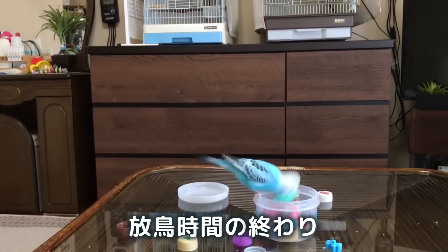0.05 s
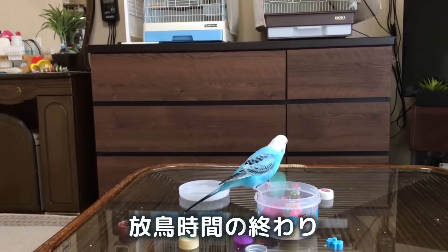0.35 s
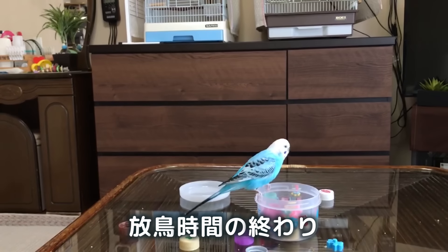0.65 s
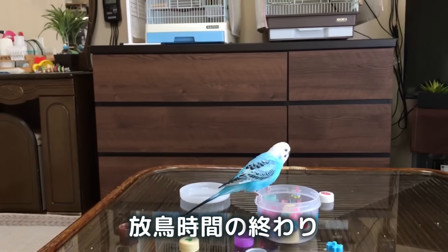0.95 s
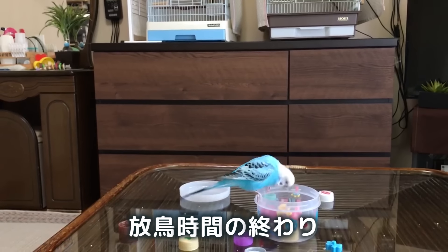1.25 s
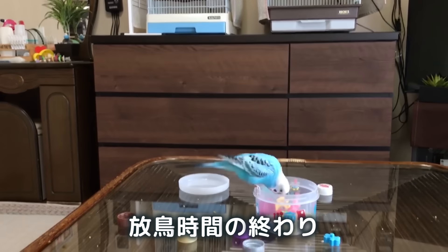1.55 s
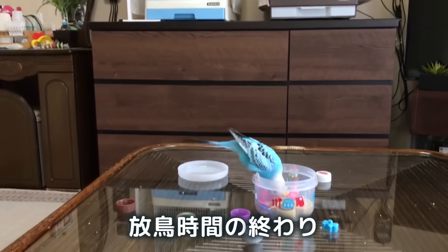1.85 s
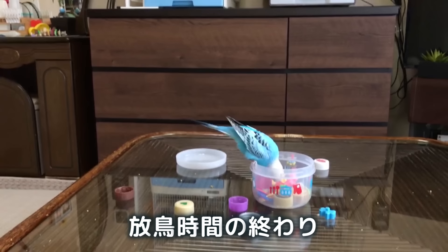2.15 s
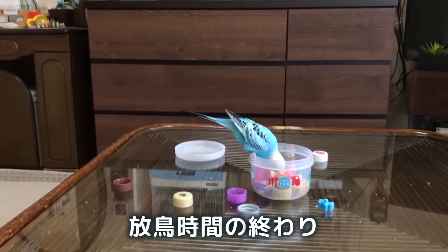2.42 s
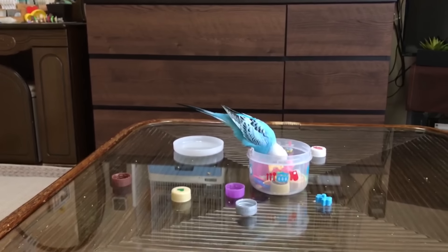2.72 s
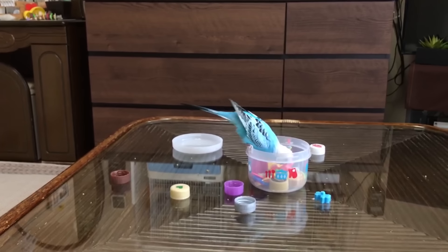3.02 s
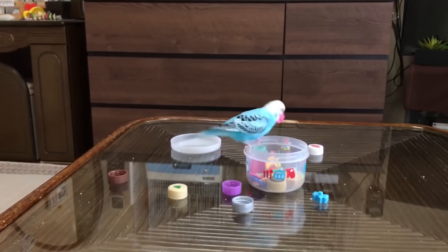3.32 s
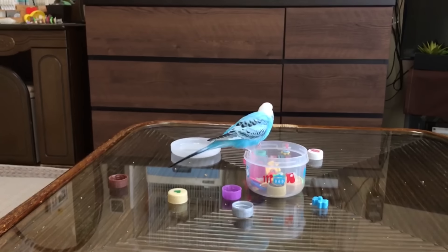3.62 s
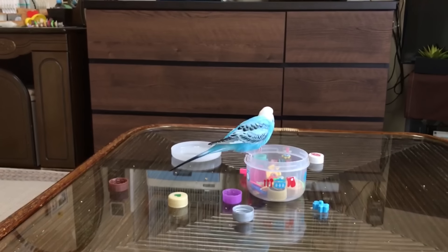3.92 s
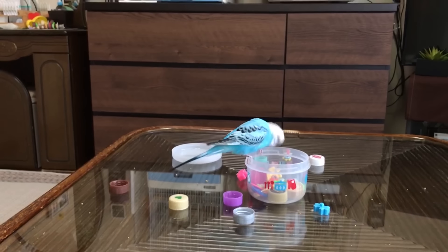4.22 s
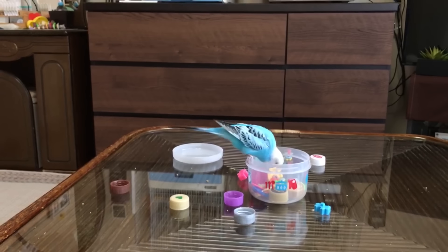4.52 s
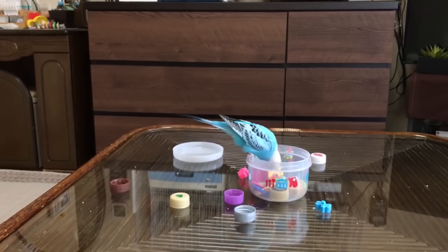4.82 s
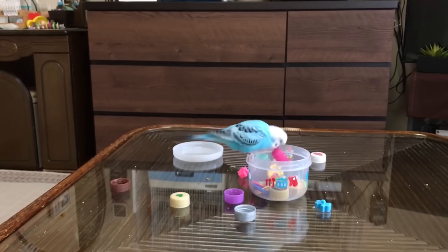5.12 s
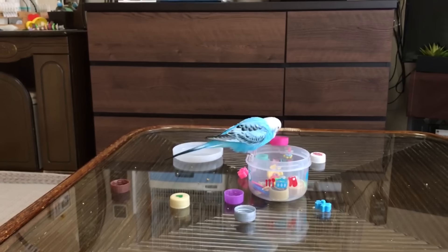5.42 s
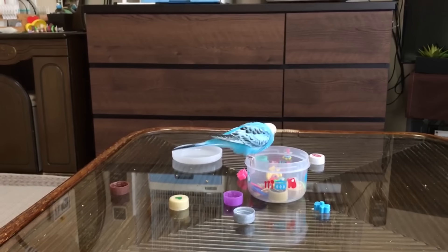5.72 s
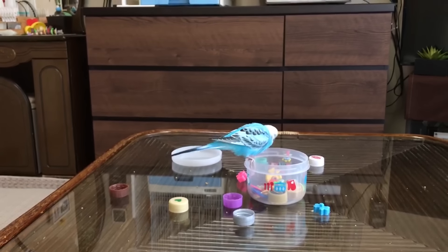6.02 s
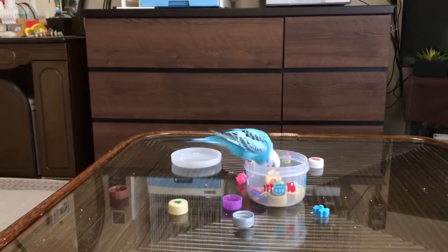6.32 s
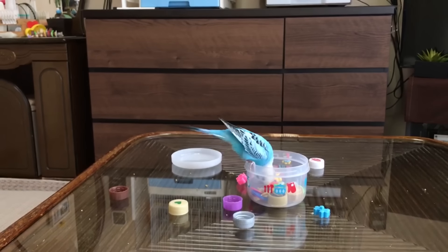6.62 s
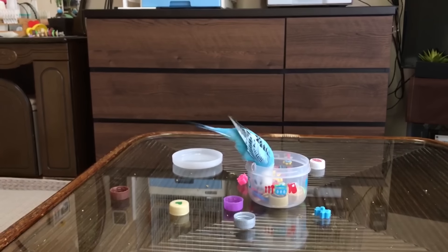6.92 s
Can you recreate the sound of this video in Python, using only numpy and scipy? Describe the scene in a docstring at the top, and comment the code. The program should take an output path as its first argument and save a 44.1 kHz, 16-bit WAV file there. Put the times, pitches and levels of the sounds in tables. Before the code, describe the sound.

In a quiet living room, a small bird rummages in a plastic tub with faint claw ticks, beak taps and feather rustles. A tossed plastic toy bounces sharply on a glass table, and another tumbles inside the tub. Later a cap lands and wobbles to rest, then a third toy clatters down, followed by a faint, high metallic ring. The glass rings briefly under each impact, and the hardest hits overload the microphone.

```python
"""A quiet living room: a budgerigar rummages in a plastic tub on a glass table.
Claws tick, feathers brush, the beak knocks small plastic toys about. Three are tossed out, the second
a cap that wobbles to rest; they bounce and rattle, and the last sets a bit of metal ringing.
Each contact is a crack plus a shell buzz, heard with the modes of the glass top and the room.
The hardest blows overload the microphone."""
import sys
import numpy as np
from scipy import signal
from scipy.fft import rfft, irfft
from scipy.io import wavfile
from scipy.ndimage import uniform_filter1d

SR = 44100
rng = np.random.default_rng(int(sys.argv[2]) if len(sys.argv) > 2 else 0)


def unload_wav(signal):
    """Save mono or channel-first audio to the path in sys.argv[1] as 16-bit WAV at rate SR, clipped to [-1, 1]."""
    wavfile.write(
        sys.argv[1],
        SR,
        np.round(np.clip(np.atleast_2d(signal).T, -1, 1) * 32767).astype(np.int16),
    )


N = 306936


def from_db(db):
    """Decibels to gain."""
    return 10 ** (np.asarray(db) / 20)


def unit_energy(x):
    """Scale to a sum of squares of one."""
    return x / np.sqrt(np.sum(x ** 2) + 1e-20)


def bin_hz(size):
    """Real FFT bin frequencies, floored at 1 Hz."""
    return np.maximum(np.arange(size // 2 + 1) * SR / size, 1)


def at_hz(points, hz):
    """Interpolate a table over log frequency."""
    known_hz, values = np.transpose(points)
    return np.interp(np.log(hz), np.log(known_hz), values)


def add(out, start_s, sound):
    """Mix a sound in at start_s."""
    start = round(start_s * SR)
    out[start:start + len(sound)] += sound[:N - start]


def noise(spectrum):
    """Steady coloured noise, unit rms."""
    coloured = rfft(rng.standard_normal(N)) * from_db(at_hz(spectrum, bin_hz(N)))
    return unit_energy(irfft(coloured, N)) * np.sqrt(N)


def resonate(x, hz, width_hz):
    """Two-pole resonance, unit peak gain."""
    radius = np.exp(-np.pi * width_hz / SR)
    feedforward = np.array([1, 0, -1]) * (1 - radius ** 2) / 2
    feedback = [1, -2 * radius * np.cos(2 * np.pi * hz / SR), radius ** 2]
    return signal.lfilter(feedforward, feedback, x + 1e-18)


def ringing(x, modes):
    """A sound plus the narrow modes it excites."""
    return x + sum(from_db(db) * resonate(x, hz, width_hz) for hz, width_hz, db in modes)


def causal_click(gain_db):
    """Minimum-phase click with this spectrum: silent before the strike."""
    cepstrum = irfft(np.log(from_db(gain_db)))
    half = len(cepstrum) // 2
    folded = 2 * cepstrum[:half] * (np.arange(half) > 0)
    return irfft(np.exp(rfft(folded, len(cepstrum))))


def blows(hits, spectrum, crack_t60_s, buzz_db, buzz_t60_s):
    """Contacts: a short crack and a dying thin-shell buzz, coloured by the body's dense, damped modes."""
    out, size = np.zeros(N), 4096
    t, hz = np.arange(size) / SR, bin_hz(size)
    octaves = np.log2(np.maximum(hz, 700))  # no tilt below 700 Hz
    crack = unit_energy(from_db(-60 * t / crack_t60_s))
    buzz = from_db(buzz_db) * unit_energy(from_db(-60 * t / buzz_t60_s))
    for start_s, db, tilt in hits:
        contact = (crack + buzz) * rng.choice([-1, 1], size)
        # flatten the noise's broad lumps so only its fine grain varies
        lumps_db = 10 * np.log10(uniform_filter1d(np.abs(rfft(contact)) ** 2, size=24))
        click = causal_click(at_hz(spectrum, hz) + tilt * octaves - lumps_db)
        blow = unit_energy(signal.fftconvolve(contact, click))
        add(out, start_s, from_db(db) * blow * np.sqrt(SR * .005))  # level as rms over 5 ms
    return out


def chatter(landings, rebound_s):
    """Four quick contacts per landing, each weaker than the last."""
    return [(start_s + k * rebound_s, db - k * loss_db, tilt)
            for start_s, db, tilt, loss_db in landings for k in range(4)]


# Room noise. Each row: frequency in Hz, relative level in dB.
AMBIENCE_SPECTRUM = [(12, -37), (20, -10), (74, -1), (130, 0.5), (198, -8), (270, 0.5), (337, -8.5),
                     (367, -9), (698, -16), (1710, -19.5), (2320, -24), (4300, -24), (7520, -31),
                     (14700, -33.5), (16000, -34)]
# Appliance hum. Each row: frequency in Hz, relative level in dB.
HUM_TONES = [(59.2, -58.5), (91.5, -55), (118.4, -55.5), (279.9, -61.5)]


def background():
    """Low room noise and the faint hum of household appliances."""
    t = np.arange(N) / SR
    hum = sum(from_db(db) * np.sqrt(2) * np.sin(2 * np.pi * (hz * t + rng.random()))
              for hz, db in HUM_TONES)
    return from_db(-44) * noise(AMBIENCE_SPECTRUM) + from_db(-8) * hum


# Claw contacts. Each row: start in seconds, level in dB, tilt in dB/octave.
CLAW_HITS = [(.058, -43, 1), (1.0086, -37, 0.5), (5.3034, -40.5, -3.5), (5.6312, -36, 2)]
# Tick colour. Each row: frequency in Hz, gain in dB.
CLAW_SPECTRUM = [(500, -31), (3000, -15.5), (5500, 1), (8000, -5.5), (11000, -10), (16000, -6)]


def claw_ticks():
    """Claws shift on the rim."""
    return blows(CLAW_HITS, CLAW_SPECTRUM, crack_t60_s=.0062, buzz_db=-6.5, buzz_t60_s=.03)


# Pecks. Each row: start in seconds, level in dB, tilt in dB/octave, loss per rebound in dB.
PECK_HITS = [(.0872, -32, 4.5, 12.5), (2.068, -28, -0.6, 4.5), (3.157, -39, 3.5, 17),
             (3.1777, -31.5, 1, 18.5), (3.2151, -25, 4, 14), (5.013, -42, 0, 15), (6.6, -46.5, 4, 10)]
# Peck colour. Each row: frequency in Hz, gain in dB.
PECK_SPECTRUM = [(200, -21), (600, -11), (900, 4), (1200, 2.5), (1700, -4.5), (2400, -6), (3400, -6),
                 (4600, -15), (5700, -13), (7500, -14.5), (11500, -22), (16000, -26)]
# Tub resonances. Each row: frequency in Hz, width in Hz, gain in dB.
TUB_MODES = [(880, 90, 0.5), (1200, 78, -3), (2270, 83, -4), (5600, 130, 5.5), (11610, 330, 0.5)]


def pecks():
    """The beak knocks toys about; the tub rings."""
    hits = chatter(PECK_HITS, rebound_s=.0055)
    knocks = blows(hits, PECK_SPECTRUM, crack_t60_s=.019, buzz_db=-3.5, buzz_t60_s=.05)
    return ringing(knocks, TUB_MODES)


# Landings. Each row: start in seconds, level in dB, tilt in dB/octave, loss per rebound in dB.
FIRST_TOY_HITS = [(.513, 2.5, .5, 0.7), (.555, -9.5, 0, 6.5), (.6262, -4.5, -0.1, 9), (.6609, -2, 1.3, 4.5),
                  (.7134, -11, 1.5, 22.5), (.7307, -10.5, 1.2, 4), (.8015, -18, -1, 3.5)]
# Shell colour. Each row: frequency in Hz, gain in dB.
FIRST_TOY_SPECTRUM = [(150, -24.5), (330, -20.5), (600, -16), (950, -16), (1250, -9.5), (1900, -4.5),
                      (3200, -1), (4200, 0), (5250, 2), (5900, -11.5), (7000, -13.5), (7600, -12.5),
                      (9400, -13), (10300, -23.5), (16000, -23.5)]
# Shell resonances. Each row: frequency in Hz, width in Hz, gain in dB.
FIRST_TOY_MODES = [(967, 51, 4.5), (3512, 20, -2), (4820, 21, -4.5), (5270, 24, -5.5), (5270, 24.4, 1),
                   (7920, 50, 0.5)]


def first_toy():
    """A tossed toy bounces, chattering from edge to edge at each landing."""
    hits = chatter(FIRST_TOY_HITS, rebound_s=.006)
    rattle = blows(hits, FIRST_TOY_SPECTRUM, crack_t60_s=.009, buzz_db=-7.5, buzz_t60_s=.078)
    return ringing(rattle, FIRST_TOY_MODES)


# Tumble contacts. Each row: start in seconds, level in dB, tilt in dB/octave.
TUMBLE_HITS = [(1.1235, -33, 0), (1.1275, -14.5, 1.7), (1.156, -30, -.18), (1.188, -28, -2.2),
               (1.2345, -33, -3), (1.281, -35.5, 0.7)]
# Tub colour. Each row: frequency in Hz, gain in dB.
TUB_SPECTRUM = [(200, -9), (500, -10), (950, 4.5), (1400, -1), (2000, 2), (3300, 3), (5000, -1.5),
                (7000, -0.5), (8500, -12.5), (11500, -7.5), (16000, -26)]


def tumble():
    """A toy falls back into the tub and over the others."""
    return blows(TUMBLE_HITS, TUB_SPECTRUM, crack_t60_s=.034, buzz_db=2, buzz_t60_s=.025)


# Rustles. Each row: centre in seconds, Gaussian sigma in seconds, level in dB.
RUSTLES = [(1.488, .016, -46), (1.653, .012, -51.5), (2.994, 0.14, -54.5), (6.167, .018, -45.5),
           (6.218, 0.068, -46.5), (6.471, 0.018, -52), (6.93, 0.016, -53)]
# Hiss colour. Each row: frequency in Hz, gain in dB.
FEATHER_SPECTRUM = [(500, -13), (3500, 4.5), (7000, 0), (13000, 1.5), (16000, -12)]


def feathers():
    """Feathers brush in soft swells of hiss as the bird turns and ducks."""
    t = np.arange(N) / SR
    swells = sum(from_db(db) * np.exp(-.5 * ((t - centre_s) / sigma_s) ** 2)
                 for centre_s, sigma_s, db in RUSTLES)
    return noise(FEATHER_SPECTRUM) * swells


# Landings. Each row: start in seconds, level in dB, tilt in dB/octave, loss per rebound in dB.
CAP_HITS = [(3.6425, -1.5, 0.14, 6.6), (3.7885, -12.5, -4, 21), (3.8657, -17, -3, 18),
            (3.9073, -12.5, -.4, 24), (4.153, -34.5, -4.5, 4.4), (4.3245, -27, 2.6, 9.4)]
# First wobble touch: start in seconds, level in dB, tilt in dB/octave.
WOBBLE_START = (3.9515, -10.5, -0.25)
# Cap colour. Each row: frequency in Hz, gain in dB.
CAP_SPECTRUM = [(150, -19), (350, -21.5), (500, -17.5), (1200, -10), (1900, -4), (2600, -3), (3200, -1.5),
                (3800, -5.5), (5000, -11.5), (6800, -12), (8000, -19.5), (11000, -27.5), (16000, -38)]
# Cap resonances. Each row: frequency in Hz, width in Hz, gain in dB.
CAP_MODES = [(1960, 56, 0.9), (3062, 110, 1.4), (3363, 70, 1.6)]


def cap(first_gap_s=.0415, gap_ratio=.68, loss_db=3, dulling_db_per_octave=.37):
    """A cap bounces, then wobbles: touches come sooner, softer and duller as it loses energy."""
    start_s, db, tilt = WOBBLE_START
    touch = np.arange(7)
    gaps_s = first_gap_s * gap_ratio ** touch
    starts_s = start_s + np.cumsum(gaps_s) - gaps_s
    wobble = zip(starts_s, db - loss_db * touch, tilt - dulling_db_per_octave * touch)
    hits = chatter(CAP_HITS, rebound_s=.0059) + list(wobble)
    rattle = blows(hits, CAP_SPECTRUM, crack_t60_s=.014, buzz_db=4, buzz_t60_s=.085)
    return ringing(rattle, CAP_MODES)


# Clacks. Each row: start in seconds, level in dB, tilt in dB/octave, loss per rebound in dB.
RIM_HITS = [(3.7794, -8.5, .4, 14), (3.788, -3, 1, 23), (5.855, -2.5, .3, 4.2)]
# Rim colour. Each row: frequency in Hz, gain in dB.
RIM_SPECTRUM = [(200, -22.5), (1000, -16.5), (2000, 2.5), (5000, -3), (6500, -1), (8500, 3.5), (10000, -7),
                (12000, -4), (16000, -14)]


def rim_clacks():
    """Hard, bright rim contacts amid the bounces."""
    hits = chatter(RIM_HITS, rebound_s=.0085)
    return blows(hits, RIM_SPECTRUM, crack_t60_s=.0069, buzz_db=0, buzz_t60_s=.057)


# Contacts. Each row: start in seconds, level in dB, tilt in dB/octave, loss per rebound in dB.
LAST_TOY_HITS = [(5.104, -32.5, 1.3, 15), (5.129, -32, 0.46, 16), (5.438, -8.5, 0, 14),
                 (5.4502, -2.5, 0, 25), (5.849, -.5, 1.35, 4), (5.899, -14.5, 1.7, 8.4)]
# Shell colour. Each row: frequency in Hz, gain in dB.
LAST_TOY_SPECTRUM = [(150, -19.5), (500, -18), (950, -4.5), (1300, -7.5), (2300, -7.5), (3050, 0),
                     (3450, 6.5), (3850, -3), (5500, -9), (7200, -16.5), (8500, -25.5), (11000, -22.5),
                     (16000, -29.5)]
# Shell resonances. Each row: frequency in Hz, width in Hz, gain in dB.
LAST_TOY_MODES = [(3200, 38, -9.5), (3450, 14, 0.5), (3430, 24, -5), (11100, 65, 6)]


def last_toy():
    """A toy taps faintly, then bounces hard; its shell rings."""
    hits = chatter(LAST_TOY_HITS, rebound_s=.0075)
    rattle = blows(hits, LAST_TOY_SPECTRUM, crack_t60_s=.011, buzz_db=-8, buzz_t60_s=.021)
    return ringing(rattle, LAST_TOY_MODES)


# Flat landing. Each row: start in seconds, level in dB, tilt in dB/octave, loss per rebound in dB.
FLAT_HITS = [(5.6874, -6.5, 0.0016, 8)]
# Knock colour, broad humps and deep valleys. Each row: frequency in Hz, gain in dB.
FLAT_SPECTRUM = [(150, -14.5), (350, -11), (700, -5.5), (1130, -17), (1600, -9), (2250, -4), (2850, -25),
                 (3450, 2.5), (4200, -4.5), (5100, -30), (6450, -14), (8100, -34), (10500, -20.5),
                 (16000, -27.5)]


def flat_knock():
    """A toy lands flat with a hollow knock."""
    hits = chatter(FLAT_HITS, rebound_s=.005)
    return blows(hits, FLAT_SPECTRUM, crack_t60_s=.012, buzz_db=-4.5, buzz_t60_s=.045)


# Touches. Each row: start in seconds, level in dB.
METAL_HITS = [(6.161, -35.5)]
# Metal partials. Each row: frequency in Hz, relative level in dB, T60 in seconds.
METAL_MODES = [(3472, -1, 0.34), (10020, -7.5, 1), (10070, 0.5, 1), (15280, -8, 0.8)]


def metal_ring():
    """Thin metal, lightly touched, rings high; two close modes beat."""
    out, t = np.zeros(N), np.arange(SR) / SR
    ring = sum(from_db(db - 60 * t / t60_s) * np.sin(2 * np.pi * hz * t) for hz, db, t60_s in METAL_MODES)
    for start_s, db in METAL_HITS:
        add(out, start_s, from_db(db) * ring)
    return out


# Furniture echoes. Each row: delay in seconds, level in dB re the tail.
ECHOES = [(.0056, -12), (.0095, -9.5), (0.031, -18.5), (0.039, -16.5)]
# Tail decay. Each row: frequency in Hz, T60 in seconds.
ROOM_T60 = [(200, 0.65), (530, .38), (1400, 0.41), (3700, 0.32), (9000, 0.35), (16000, 0.33)]


def room(x, build_s=.0025):
    """Reflections only: early echoes and a diffuse tail whose treble dies first."""
    t, centres_hz = np.arange(SR) / SR, np.geomspace(125, 16000, 8)
    white, tail = rfft(rng.standard_normal(SR)), 0
    for hz, share in zip(centres_hz, np.eye(len(centres_hz))):
        band_gain = np.interp(np.log(bin_hz(SR)), np.log(centres_hz), share)
        tail += irfft(white * band_gain, SR) * from_db(-60 * t / at_hz(ROOM_T60, hz))
    response = unit_energy(tail * (1 - np.exp(-t / build_s)))
    for delay_s, db in ECHOES:
        response[round(delay_s * SR)] += from_db(db)
    return signal.fftconvolve(x, response)[:N]


# Table-top resonances. Each row: frequency in Hz, width in Hz, gain in dB.
GLASS_MODES = [(198, 25, -1), (354.1, 6.7, 14), (625, 6.8, 5), (933, 7.3, -5.5), (1545, 16, -6),
               (1998, 10, 0), (2400, 18, -0.5), (2867, 16, -10.5), (2968, 71, -10.5), (3404, 26, 0.5),
               (3730, 16, -3.5), (4080, 16, -10.5), (6730, 13, -3.5), (7240, 20, -5.5)]


def glass_top(x):
    """The glass rings on after each blow."""
    return ringing(x, GLASS_MODES)


def scene(low_cut_hz=130):
    """Blows through room and table, plus metal, feathers and background; mono."""
    first, last = first_toy(), last_toy()
    clatter = cap() + rim_clacks() + flat_knock()
    tub = tumble() + pecks() + claw_ticks()
    direct = first + clatter + last + tub
    scattered = from_db(-5) * (first + clatter) + from_db(-5.5) * (last + tub)
    impacts = glass_top(direct + room(scattered))
    # small objects radiate little bass
    low_cut = signal.butter(2, low_cut_hz, "high", fs=SR, output="sos")
    return (signal.sosfilt(low_cut, impacts) + metal_ring() + feathers() + background())[None]


def record(dry, cutoff_hz=15950):
    """Microphone overload: clip at full scale, then a steep low-pass."""
    low_pass = signal.butter(30, cutoff_hz, fs=SR, output="sos")
    return signal.sosfiltfilt(low_pass, np.clip(dry, -1, 1))


dry = scene()
out = record(dry)
unload_wav(out)
```